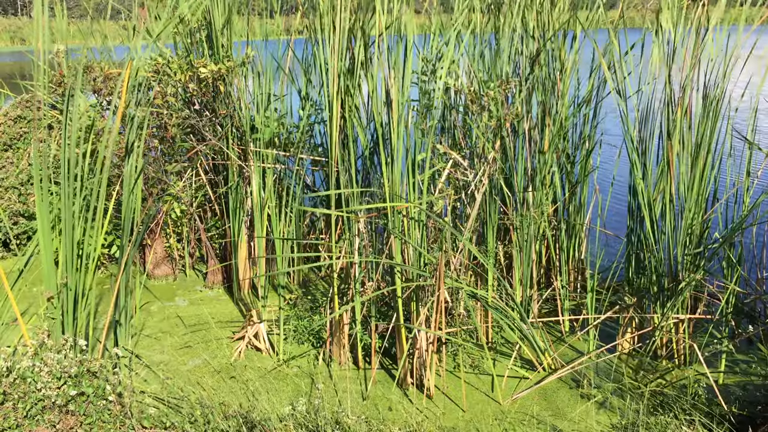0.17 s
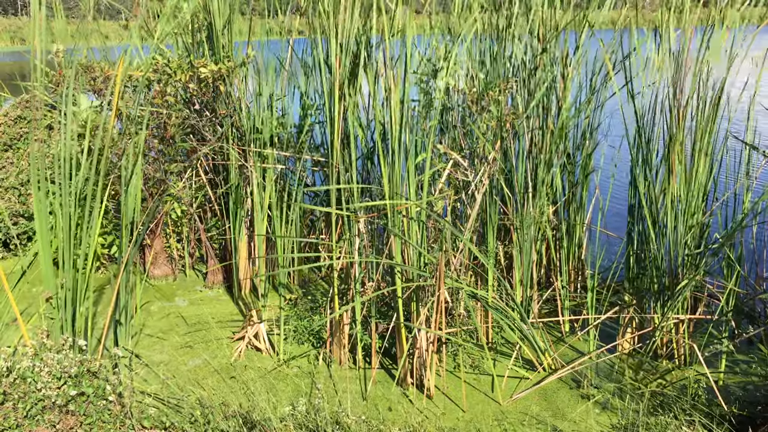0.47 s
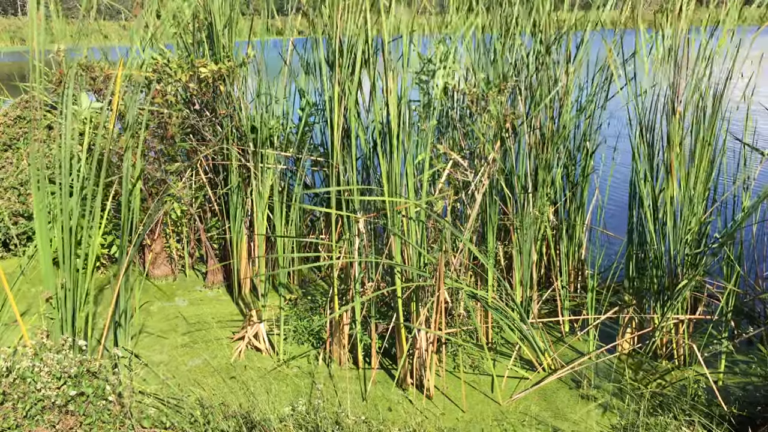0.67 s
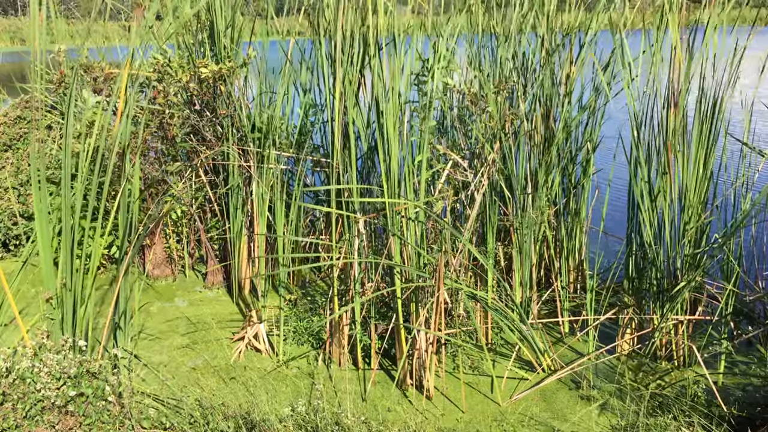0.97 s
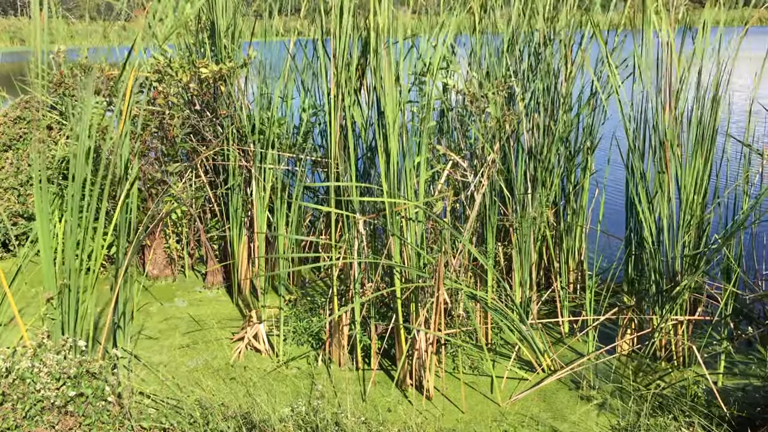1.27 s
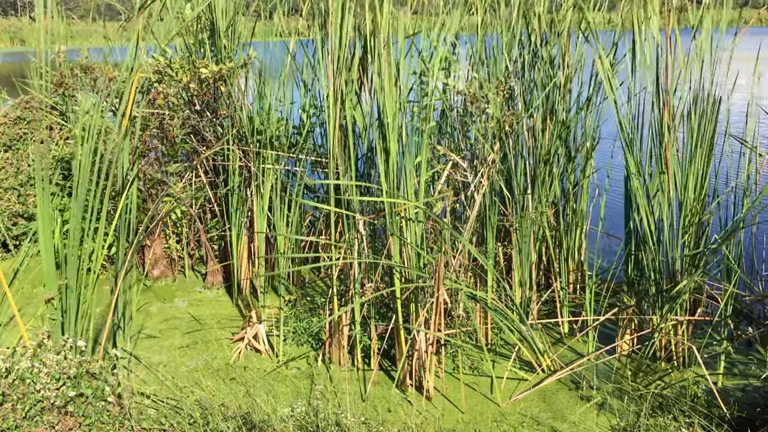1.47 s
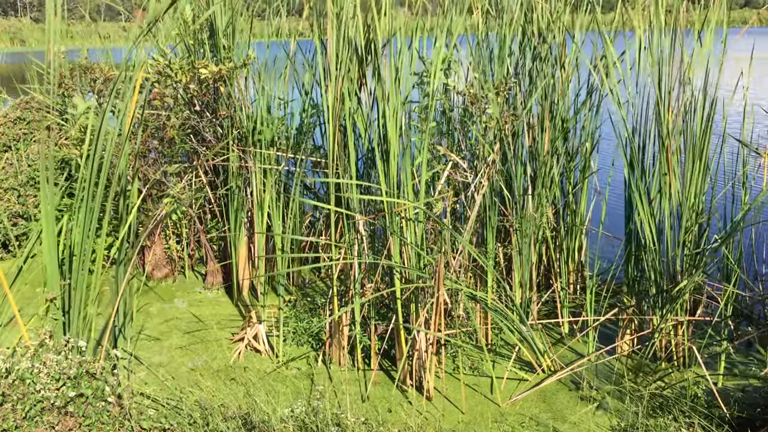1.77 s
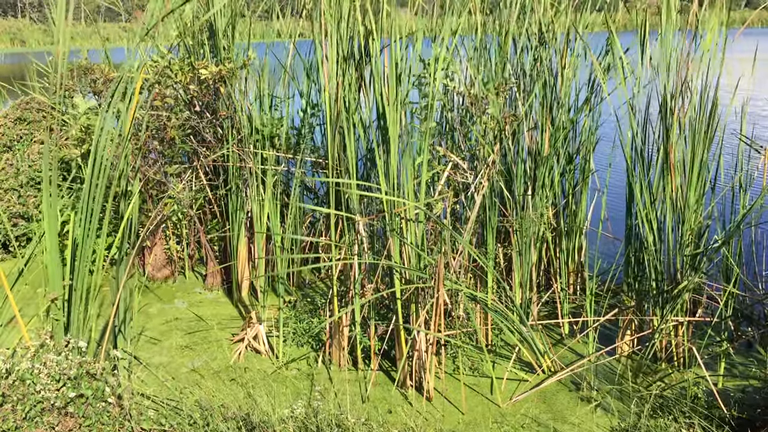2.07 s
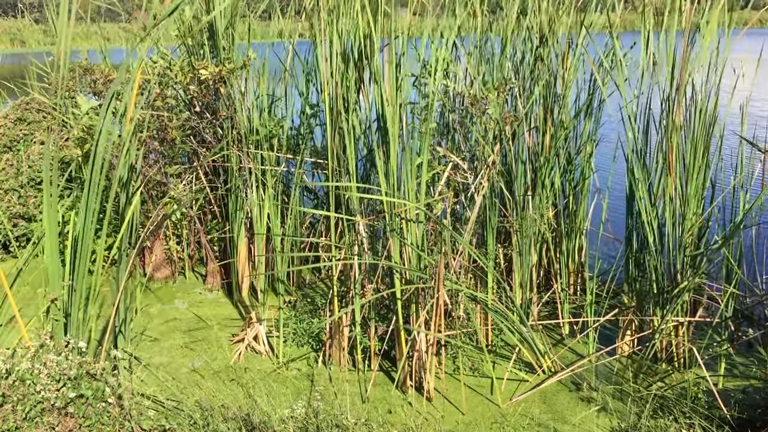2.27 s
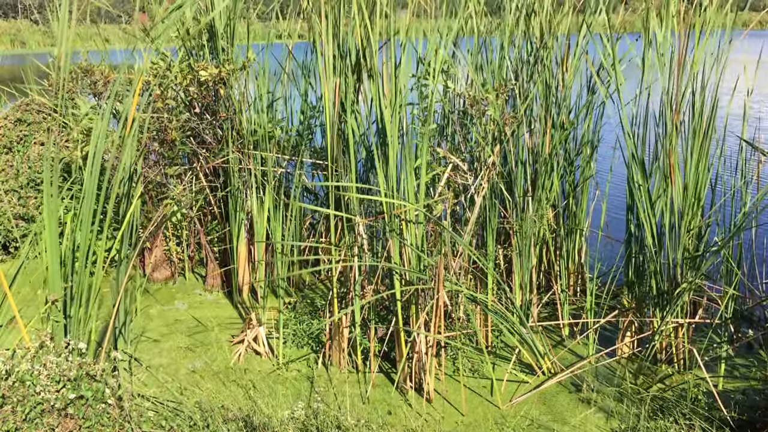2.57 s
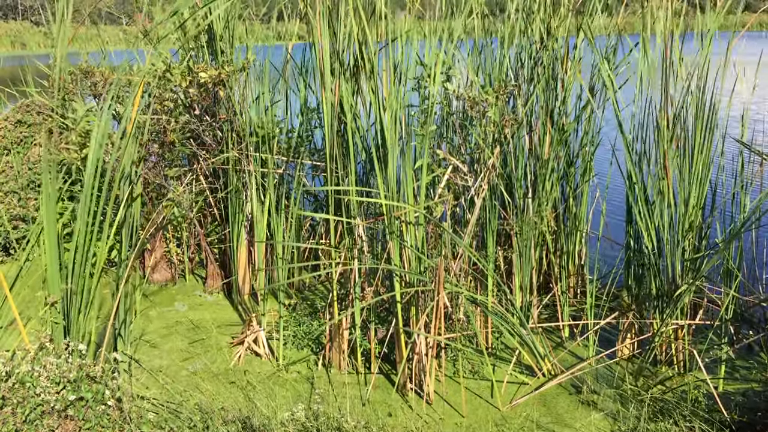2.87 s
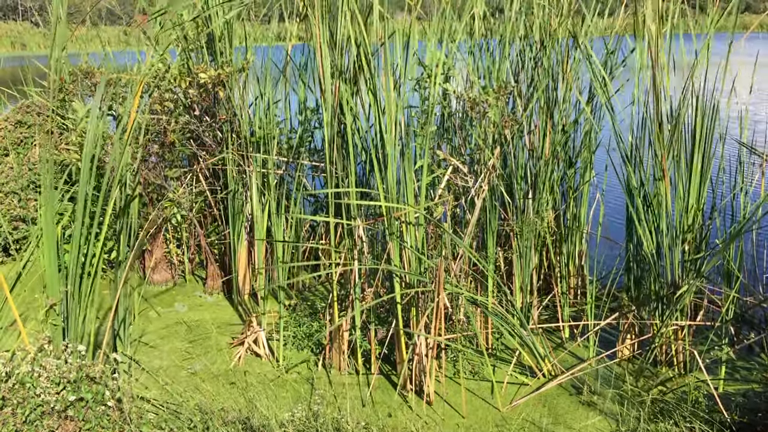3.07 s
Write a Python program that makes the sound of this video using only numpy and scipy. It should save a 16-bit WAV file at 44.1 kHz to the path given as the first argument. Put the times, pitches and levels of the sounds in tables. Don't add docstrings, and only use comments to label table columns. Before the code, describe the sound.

Two katydids close by in pond reeds give quick, dry, very high ticks, then fall one after the other into a sustained fizzing buzz; low breeze rumbles and thumps on the microphone outdoors.

```python
import sys
import numpy as np
from scipy import signal
from scipy.fft import rfft, irfft, next_fast_len
from scipy.io import wavfile
from scipy.ndimage import uniform_filter1d

SR = 44100
rng = np.random.default_rng(int(sys.argv[2]) if len(sys.argv) > 2 else 0)


def field_ratio(decibels):
    return 10 ** (np.asarray(decibels, dtype=float) / 20)


def wrap_up_sound(samples):
    columns = np.atleast_2d(samples).T
    tamed = np.clip(columns, -1, 1)
    steps = np.round(tamed * 32767).astype(np.int16)
    wavfile.write(sys.argv[1], SR, steps)


N = 142002
T = np.arange(N) / SR

# [t/s, peak level/dB, length/s]
TICKS = [(.018, -35, .006), (.0615, -34, .008), (.0835, -28, .006), (.107, -33, .008), (.147, -26, .006),
         (.2025, -36, .007), (.210, -26, .007), (.252, -34, .006), (.273, -26, .007), (.307, -30, .006),
         (.342, -25, .006), (.359, -34, .008), (.411, -28, .009), (.494, -54, .006), (.528, -29, .007),
         (.587, -28, .008), (.649, -27, .007), (.738, -25, .008)]
# [t/s, peak level/dB, share of the deep colour]
FLICKS = [(0.037, -42, 0.14), (0.0534, -42.5, 0.16), (0.116, -42.5, 0.17), (0.179, -41, 0.15),
          (0.2267, -45, 0.33), (0.2428, -42, 0.3), (0.282, -46, 0.56), (0.31, -43, 0.49), (0.335, -48, 0.6),
          (0.3773, -43.5, 0.15), (0.3904, -46, 0.27), (0.496, -42, 0.1), (0.5104, -49, 0.24),
          (0.5556, -43, 0.15), (0.6164, -45, 0.38), (0.7028, -44, 0.25)]
# [f/Hz, level/dB per Hz]
EARLY = [(4000, -68), (7000, -40), (9500, -15), (11500, -16), (13000, -7.5), (14500, 0.5), (16500, -7)]
# [f/Hz, level/dB per Hz]
LATE = [(4000, -45), (7000, -26.5), (9500, -23), (11500, -1.5), (13000, 2), (14500, 0), (16500, -7)]
# [f/Hz, level/dB per Hz]
OPENING = [(4000, -45.5), (6000, -19.5), (7000, -9.5), (8300, -3), (9700, 0.5), (11000, 0), (13000, -6),
           (16500, -28)]
# [f/Hz, level/dB per Hz]
FLICK_HIGH = [(4000, -41), (6500, -27), (7600, -13), (8300, -5), (9700, 3), (10800, -6), (12000, -18),
              (15500, -9)]
# [f/Hz, level/dB per Hz]
FLICK_DEEP = [(4000, -33), (5800, -21), (6600, -9), (7400, -8), (8500, -4.5), (10000, -12), (16500, -25)]
# [t/s, cycles]
NEAR_LEAD = [(.75, .3), (1.11, .42), (1.6, .58), (2.1, .58), (2.85, .67), (3.25, .56)]
# [t/s, cycles]
FAR_LEAD = [(.55, .2), (.98, 1.3), (1.38, 1.92), (1.79, 2.27), (2.06, 2.45), (2.34, 2.25), (2.74, 1.87),
            (3.25, 1.5)]
# [t/s, level/dB]
NEAR_EFFORT = [(.77, -46), (.82, -47), (1.0, -41), (1.5, -38), (2.3, -38.5), (3.2, -36.5)]
# [t/s, level/dB]
FAR_EFFORT = [(.545, -54), (.6, -44), (.7, -43), (.9, -40.5), (1.5, -40), (2.3, -40), (3.2, -43.5)]
NEAR_WING = (.2, .68, .99, .09)
FAR_WING = (.25, .63, .89, .16)
# [delay/s, level/dB]
MIRRORS = [(.0017, -19), (.0029, -18), (.0046, -19), (.0071, -20), (.0113, -21)]
# [t/s, level/dB]
BREEZE = [(0.0, -33.5), (0.13, -41), (0.15, -40), (0.52, -32.5), (0.55, -37), (1.03, -36), (1.11, -29.5),
          (1.14, -35.5), (1.26, -37), (1.33, -32.5), (1.56, -36.5), (2.26, -37), (2.37, -44), (2.76, -48.5),
          (2.79, -41), (2.83, -44.5), (3.22, -39)]
# [f/Hz, level/dB per Hz]
RUMBLE = [(22, -39.5), (45, -0.5), (90, 1), (200, -2), (270, -10), (330, -21), (400, -37.5), (460, -46)]
# [t/s, f/Hz]
MOAN = [(0, 65), (.2, 113.6), (.45, 168.6), (1.0, 96.2), (1.35, 133.8), (1.55, 107), (2.0, 147.7),
        (2.25, 85), (2.8, 68.6), (3.2, 64.8)]
# [t/s, level/dB, f/Hz]
BUMPS = [
    (.436, -33, 270),
    (.630, -38, 210),
    (.918, -52, 260),
    (1.096, -22, 110),
    (1.112, -23, 130),
    (1.121, -33, 290),
    (1.125, -52, 400),
]
# [f/Hz, level/dB per Hz]
HUSH = [(430, -10), (520, -1), (640, 1), (1200, -4.5), (1600, -4), (5000, -9.5), (6500, -29)]
# [f/Hz, level/dB per Hz]
HAZE = [(250, -2), (450, -1), (700, -8), (1200, -15), (2500, -22)]
# [t/s, level/dB]
HAZE_LEVEL = [(0, -67.5), (.4, -70), (.48, -64.5), (.7, -72), (1.0, -88.5), (2.3, -86), (2.6, -76.5),
              (3.2, -74.5)]
# [f/Hz, level/dB per Hz]
HISS = [(4500, -8), (5500, 0), (7000, -2), (9000, -4), (12000, -6), (16000, -5)]

TICK_RISE_S, TICK_FALL_S, TICK_SAG_S = .0007, .0013, .004
TICK_DB, TICK_LATE_DB = -6, -4.0
FLICK_RISE_S, FLICK_HOLD_S, FLICK_FALL_S, FLICK_LEAD_S, FLICK_DB = .005, .005, .002, .0022, -5
NEAR_RATE_HZ, FAR_RATE_HZ = 59.4, 73.3
NEAR_OPEN_DB, FAR_OPEN_DB, LATE_DB, BUZZ_DB = -15, -10, -9, 5.0
SWELL, CUT = .36, .04
STROKE_SPREAD_DB, TEETH_PER_S, TOOTH_SPREAD_DB = .7, 20000, .8
REEDS_T60_S, REEDS_GAP_S = .14, .002
TICK_SCATTER_DB, FLICK_SCATTER_DB, NEAR_SCATTER_DB, FAR_SCATTER_DB = -11, -8, -3.5, .5
PIP_S, PIP_LENGTH_S, PIP_FROM_HZ, PIP_TO_HZ, PIP_DB = .446, .05, 8650, 9350, -64.5
LUMP_DB, LUMP_S, BRIGHT = 1.3, .02, .2
MOAN_DB, MOAN_WIDTH_HZ, BUMP_TURNS = -3.5, 22, 1.3
HUSH_DB, HUSH_PATCH_DB, HISS_DB = -71.5, 1.8, -77
NOTCH_HZ, NOTCH_WIDTH_HZ, NOTCH_DB = 10380, 130, -7
DIP_HZ, DIP_WIDTH_HZ, DIP_DB = 4870, 110, -3.5
EDGE_HZ, EDGE_SLOPE_HZ = 15270, 190


def ticks():
    early, late = np.zeros(N), np.zeros(N)
    for s, db, hold in TICKS:
        early += field_ratio(db + TICK_DB) * stroke(T - s, TICK_RISE_S, hold - .001, TICK_FALL_S)
        late += field_ratio(db + TICK_DB + TICK_LATE_DB) * stroke(T - s, TICK_SAG_S, hold, TICK_FALL_S)
    high, deep = np.zeros(N), np.zeros(N)
    for s, db, share in FLICKS:
        flick = stroke(T - s + FLICK_LEAD_S, FLICK_RISE_S, FLICK_HOLD_S, FLICK_FALL_S)
        flick = field_ratio(db + FLICK_DB) * flick
        high += np.sqrt(1 - share) * flick
        deep += np.sqrt(share) * flick
    closing = scraped(early, EARLY, TICK_SCATTER_DB) + scraped(late, LATE, TICK_SCATTER_DB)
    opening = scraped(high, FLICK_HIGH, FLICK_SCATTER_DB) + scraped(deep, FLICK_DEEP, FLICK_SCATTER_DB)
    return closing + opening


def buzz(rate, lead, effort, wing, open_db, scatter_db):
    start, end, centre, length = wing
    turns = rate * T + curve(lead)
    place = turns % 1
    strength = rng.standard_normal(300)
    level = field_ratio(curve(effort) + BUZZ_DB) * (T > effort[0][0])
    closing = level * field_ratio(STROKE_SPREAD_DB * strength[turns.astype(int)])
    early = closing * stroke(place - start, SWELL, end - start - CUT, CUT)
    late = field_ratio(LATE_DB) * closing * stroke(place - start, end - start, end - start + CUT, CUT)
    off = (place - centre + .5) % 1 - .5
    opening = level * field_ratio(open_db) * np.exp(-(2 * off / length) ** 2)
    closing_sound = scraped(early, EARLY, scatter_db) + scraped(late, LATE, scatter_db)
    return closing_sound + scraped(opening, OPENING, scatter_db)


def stroke(t, rise, hold, fall):
    return np.sin(np.pi / 2 * np.clip(t / rise, 0, 1)) ** 2 * np.exp(-np.maximum(t - hold, 0) / fall)


def teeth():
    hit = rng.random(N) < TEETH_PER_S / SR
    size = np.minimum(rng.exponential(1, N), 5)
    return hit * field_ratio(TOOTH_SPREAD_DB * size) * np.sign(rng.standard_normal(N))


def scraped(level, colour, scatter_db):
    keep = np.exp(-6 * np.log(10) / (REEDS_T60_S * SR))
    energy = signal.lfilter([1 - keep], [1, -keep], level ** 2)
    late = np.interp(T - REEDS_GAP_S, T, energy)
    direct = level * coloured(teeth(), colour)
    return direct + field_ratio(scatter_db) * np.sqrt(late) * coloured(rng.standard_normal(N), colour)


def mirrored(x):
    return x + sum(field_ratio(db) * np.pad(x, (int(s * SR), 0))[:N] for s, db in MIRRORS)


def pip():
    u = np.clip((T - PIP_S) / PIP_LENGTH_S, 0, 1)
    fuzz = evened(uniform_filter1d(rng.standard_normal(N), 60))
    turns = np.cumsum(PIP_FROM_HZ + (PIP_TO_HZ - PIP_FROM_HZ) * u) / SR
    swell = np.sin(np.pi * u) ** 0.3 * (u < 1)
    return field_ratio(PIP_DB) * swell * (0.47 + fuzz) * np.sin(2 * np.pi * turns)


def breeze():
    level = curve(BREEZE)
    air = coloured(rng.standard_normal(N), RUMBLE)
    low = signal.sosfiltfilt(signal.butter(2, 110, fs=SR, output="sos"), air)
    air = low + (air - low) * field_ratio(BRIGHT * (level - level.mean()))
    air = evened(air) + field_ratio(MOAN_DB) * moan()
    width = max(int(LUMP_S * SR), 9)
    lumps = evened(uniform_filter1d(uniform_filter1d(rng.standard_normal(N), width), width))
    return evened(air * field_ratio(LUMP_DB * lumps)) * field_ratio(level) - bumps()


def moan():
    turn = np.exp(2j * np.pi * np.cumsum(curve(MOAN)) / SR)
    keep = np.exp(-np.pi * MOAN_WIDTH_HZ / SR)
    tone = rng.standard_normal(N) / turn
    for _ in range(2):
        tone = signal.lfilter([1], [1, -keep], tone)
    return evened((turn * tone).real)


def bumps():
    out = np.zeros(N)
    for s, db, hz in BUMPS:
        u = np.clip((T - s) * hz / BUMP_TURNS, 0, 1)
        out += field_ratio(db) * np.sin(np.pi * u) ** 2 * np.sin(2 * np.pi * hz * (T - s))
    return out


def hush():
    z = signal.stft(coloured(rng.standard_normal(N), HUSH), SR, nperseg=512)[2]
    patch = uniform_filter1d(rng.standard_normal(z.shape), 8, 0)
    patch = evened(uniform_filter1d(patch, 6, 1))
    sound = signal.istft(z * field_ratio(HUSH_PATCH_DB * patch), SR, nperseg=512)[1][:N]
    return field_ratio(HUSH_DB) * evened(sound)


def haze():
    murmur = field_ratio(curve(HAZE_LEVEL)) * coloured(rng.standard_normal(N), HAZE)
    return murmur + field_ratio(HISS_DB) * coloured(rng.standard_normal(N), HISS)


def evened(x):
    return x / np.sqrt(np.mean(x ** 2) + 1e-20)


def curve(points):
    t, value = np.transpose(points)
    return np.interp(T, t, value)


def coloured(x, points):
    size = next_fast_len(N + 8192)
    hz = np.fft.rfftfreq(size, 1 / SR)
    f, db = np.transpose(points)
    shape_db = np.interp(np.log(hz + 1), np.log(f + 1), db, left=db[0] - 20, right=db[-1] - 20)
    return evened(irfft(rfft(x, size) * field_ratio(shape_db), size)[:N])


def scene():
    near = buzz(NEAR_RATE_HZ, NEAR_LEAD, NEAR_EFFORT, NEAR_WING, NEAR_OPEN_DB, NEAR_SCATTER_DB)
    far = buzz(FAR_RATE_HZ, FAR_LEAD, FAR_EFFORT, FAR_WING, FAR_OPEN_DB, FAR_SCATTER_DB)
    insects = mirrored(ticks() + near + far)
    return (insects + pip() + breeze() + hush() + haze())[None]


def top_cut(x):
    return signal.sosfilt(signal.butter(12, 16500, fs=SR, output="sos"), x)


def record(dry):
    size = next_fast_len(N + 8192)
    hz = np.fft.rfftfreq(size, 1 / SR)
    notch = NOTCH_DB * np.exp(-((hz - NOTCH_HZ) / NOTCH_WIDTH_HZ) ** 2)
    dip = DIP_DB * np.exp(-((hz - DIP_HZ) / DIP_WIDTH_HZ) ** 2)
    edge = -76 * np.clip((hz - EDGE_HZ) / EDGE_SLOPE_HZ, 0, 1)
    mix = irfft(rfft(dry, size) * field_ratio(notch + dip + edge), size)[:, :N]
    return top_cut(mix)


dry = scene()
out = record(dry)
wrap_up_sound(out)
```